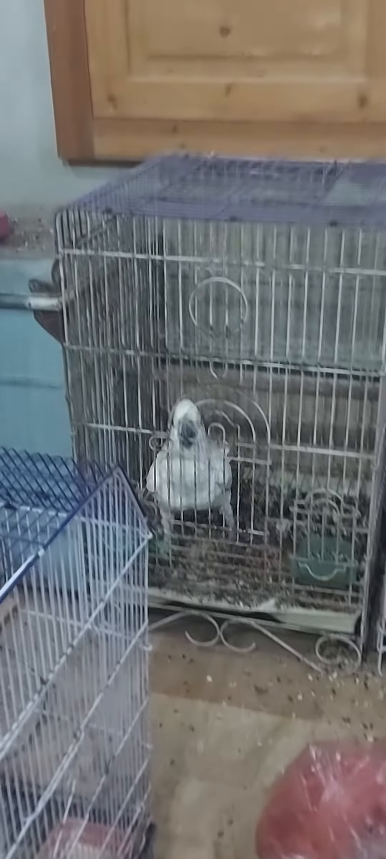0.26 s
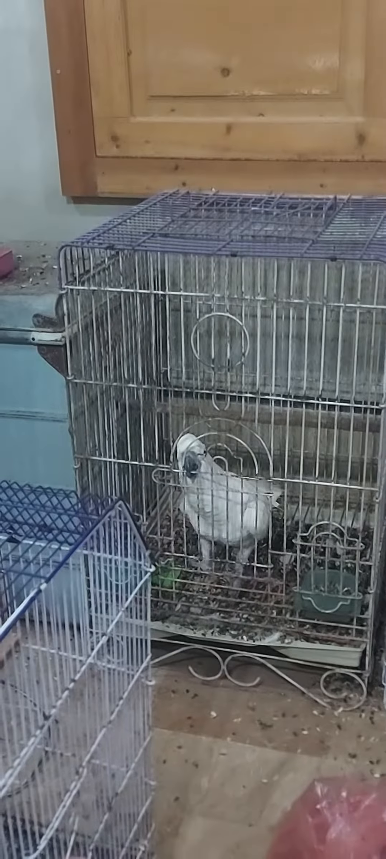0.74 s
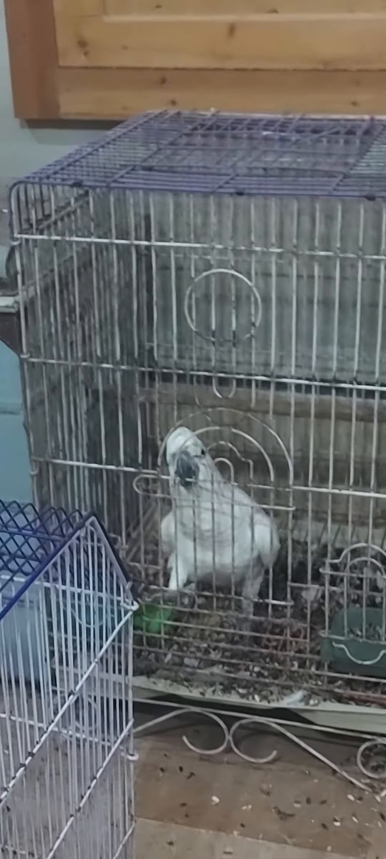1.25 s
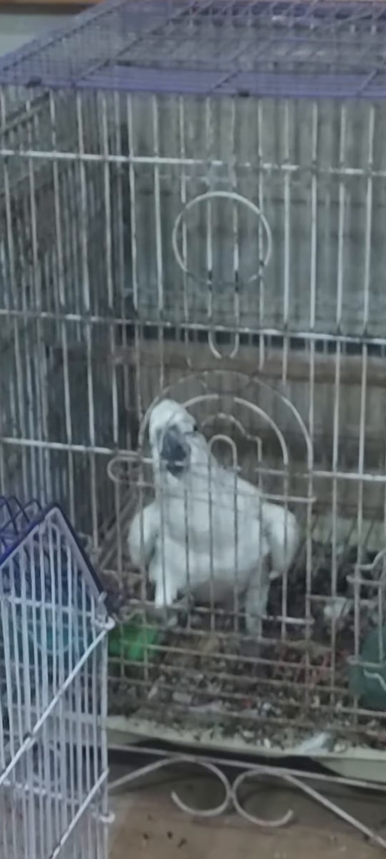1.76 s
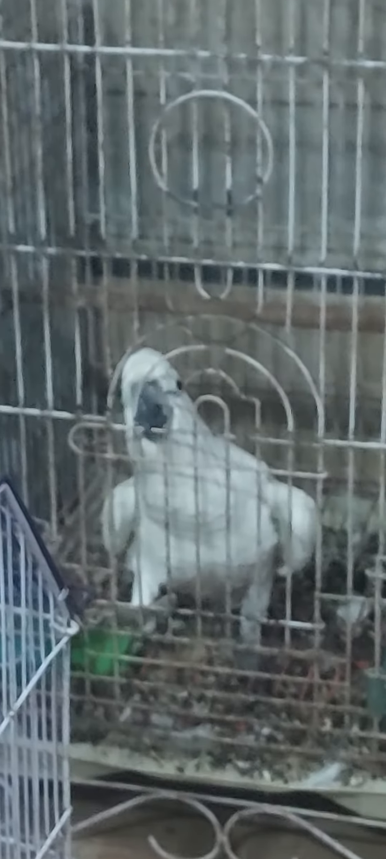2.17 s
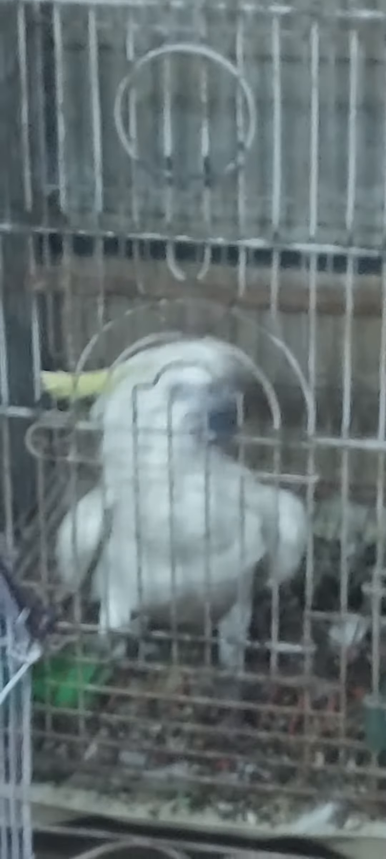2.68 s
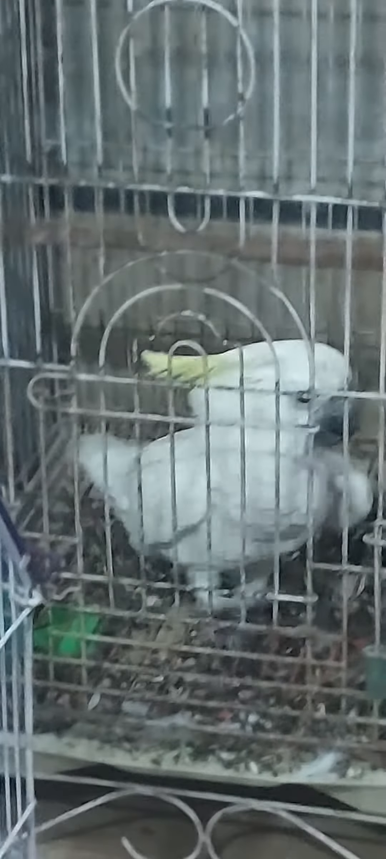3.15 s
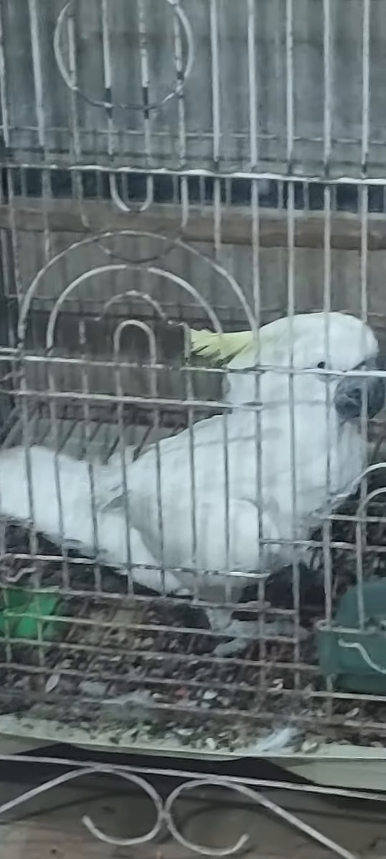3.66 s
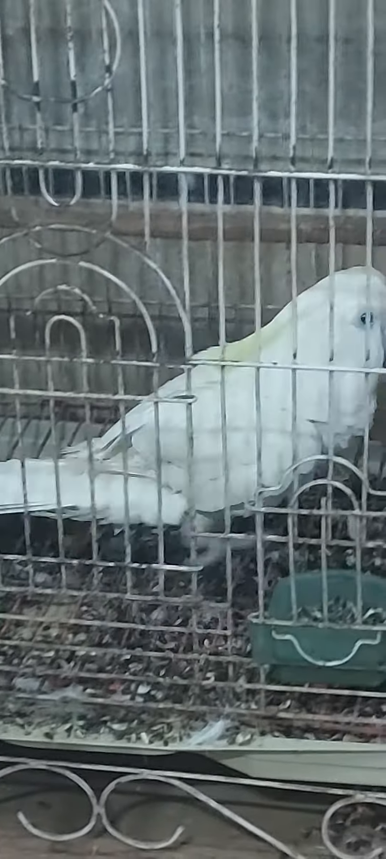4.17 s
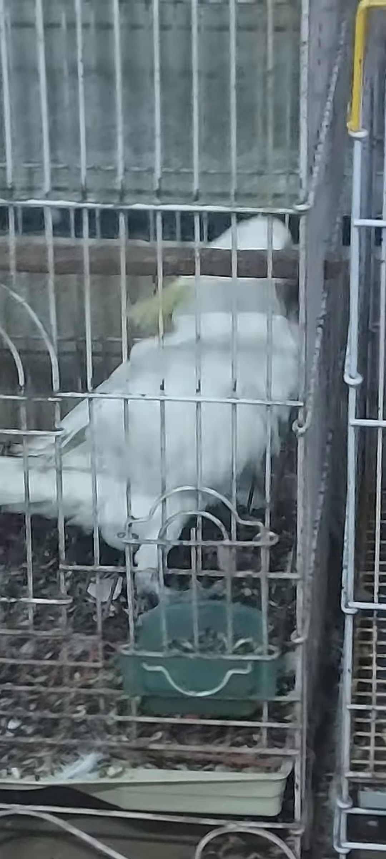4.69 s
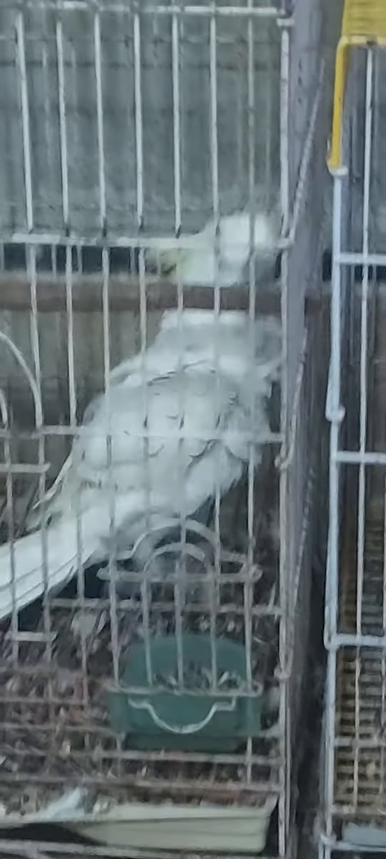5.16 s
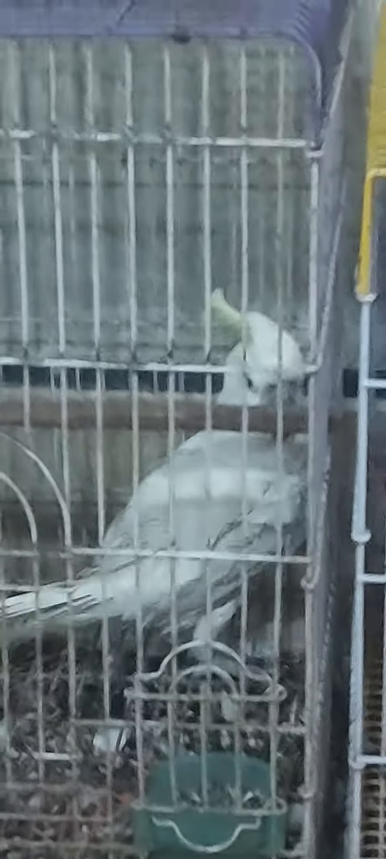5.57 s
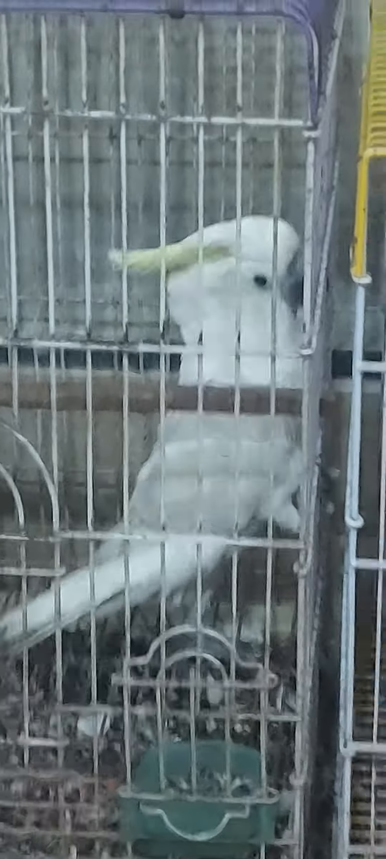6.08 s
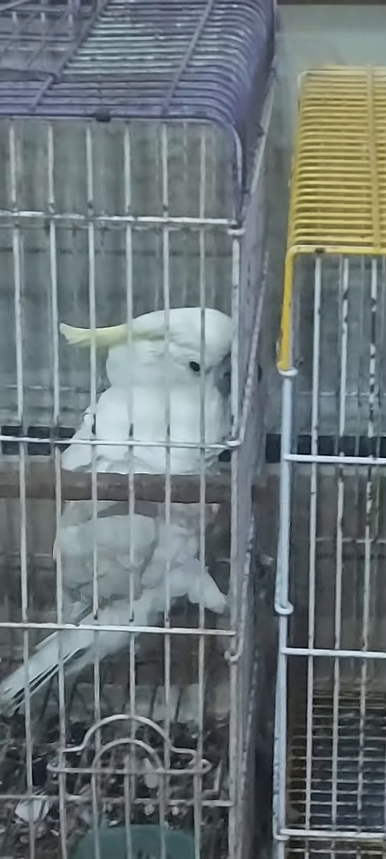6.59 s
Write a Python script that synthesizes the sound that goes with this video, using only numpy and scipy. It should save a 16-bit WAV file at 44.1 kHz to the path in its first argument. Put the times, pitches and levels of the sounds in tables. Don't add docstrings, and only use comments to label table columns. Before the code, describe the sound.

A large parrot is already screeching at 0 s, in a hard-walled room that rings for about half a second. Its calls are loud, shrill and rough, mostly a quarter second long: a breathy start, a piercing high tone, then a sinking pitch that splits into gritty rasp. They come at 0, 0.1, 0.5 and 0.9 s, the fourth with a sliding whistle; then 1.8 and 2.1; then a run at 2.8, 3.2, 3.5 and 3.8. A pause follows, until two bright screams at 5.1 and 5.7. Low hoarse gasps accompany or fall between calls. Faint steady hum, soft air hiss and muffled low steps continue underneath, steps busiest before 2.3 s. Small rustles puff at 1.3, 1.6 and 2.7. Around 6.1-6.2 a dull knock bumps the handheld stereo microphone with a louder rustle, then scattered litter sounds at 6.5 and 6.8. The calls lean slightly right, shifting as the microphone swings.

```python
import sys
import numpy as np
from scipy import signal
from scipy.fft import rfft, irfft, next_fast_len
from scipy.io import wavfile
from scipy.ndimage import uniform_filter1d, minimum_filter1d

SR = 44100
rng = np.random.default_rng(int(sys.argv[2]) if len(sys.argv) > 2 else 0)


def generate_wav(signal):
    frames = np.transpose(np.atleast_2d(signal))
    scaled = np.clip(frames, -1, 1) * 32767
    pcm = np.round(scaled).astype(np.int16)
    wavfile.write(sys.argv[1], SR, pcm)


def boost(x):
    u = np.asarray(x, float) / 20
    return 10 ** u


N = 301203
LEAD = 8000
LONGEST = 26000

# start in seconds,
# lock after in seconds, length in seconds, effort in dB, brightness in dB.
SCREECHES = [(0.0, -.2, 0.095, -15.5, -4.5), (.099, .004, 0.2, -12, -2), (0.477, .02, .24, -13.5, -4.5),
             (0.904, .023, 0.23, -13.5, -2), (1.758, .025, .25, -11, -0.5), (2.086, .015, .23, -13, -2.5),
             (2.792, .018, .255, -12, -2), (3.176, .015, 0.2, -14.5, -2), (3.529, .023, .21, -12, -1.5),
             (3.8, .018, 0.27, -13.5, -5), (5.117, .024, 0.24, -12.5, 1), (5.672, .031, .255, -12, 0.5)]
# first pitch in Hz, top pitch in Hz,
# top reached at share of length, last pitch in Hz, wobble as a share of the pitch.
PITCHES = [(4270, 4290, 0.016, 4116, .022), (4820, 4790, 0.027, 4330, .015), (4870, 4880, .08, 4320, 0.019),
           (4897, 4900, .3, 4450, 0.01065), (4600, 4550, .3, 4145, 0.02), (4895, 4920, .25, 4180, .017),
           (4820, 4960, .08, 4190, .019), (4620, 4500, 0.394, 4250, 0.0214), (4495, 4490, 0.09, 4400, .013),
           (4165, 4720, 0.33, 4040, .013), (4760, 4850, .2, 4430, .013), (4876, 4860, 0.11, 4237, 0.018)]
# doubling sets in at share of length, doubling in dB,
# rasp returns at share of length, rasp in dB, rasp at its clearest in dB.
BREAKS = [(.3, -7, 0.51, -16.5, -22.5), (0.41, -0.5, .7, -12.5, -28.5), (0.68, -2.5, 0.79, -12.5, -28.5),
          (0.57, -4, 0.69, -11, -19.5), (.4, -7, .7, -15, -21.5), (.6, -5, .6, -16, -21.5),
          (.5, -8, .75, -11.5, -19.5), (0.54, -13, 0.7, -14, -21), (.42, -2.5, 0.71, -13.5, -25),
          (0.77, -8, 0.79, -14, -28), (0.55, -0.5, .8, -10.5, -28), (0.56, -4, 0.704, -13.5, -26.5)]
# onset against full effort in dB, swell in seconds,
# release from share of length, release depth in dB, pitch has sunk by share of length.
BREATHS = [(-5, .03, .4, -10, .9), (-5, 0.022, 0.63, -11, .85), (-5, .04, 0.73, -17, .85),
           (-3.5, .04, 0.77, -25.5, .9), (-6.5, 0.068, 0.45, -18.5, 0.94), (-2.5, .08, 0.68, -10.5, .9),
           (-10, 0.12, 0.67, -9, .85), (-2, 0.12, 0.81, -24.5, 0.79), (-6, .055, .55, -17, .9),
           (4, .03, 0.74, -18, .8), (-7.5, 0.067, 0.53, -6, .9), (-3.5, 0.14, 0.7, -21.5, .9)]
# frequency in Hz, level in dB.
THROAT = [(1200, -46.5), (1700, -22), (2150, -10.5), (3400, -7.5), (4600, -1.5), (5700, -15), (6900, -13),
          (8100, -10.5), (9300, -24), (11500, -16.5), (14000, -26.5), (16500, -27)]
# frequency in Hz, level in dB.
RASP = [(700, -40), (1300, -25), (2100, -14), (2800, -14.5), (3600, -3), (4600, -5), (6000, -12),
        (8500, -13), (10000, -18), (13000, -20), (16500, -31)]
# frequency in Hz, time to fall by 60 dB in seconds.
ROOM_RING = [(1000, 0.46), (2300, 0.51), (4500, 0.49), (8000, 0.43), (14000, 0.28)]
# left delay in seconds, left gain,
# right delay in seconds, right gain.
NEAR_ECHOES = [(.0031, 0.87, 0.0026, -0.88), (.0058, -0.43, 0.0059, 1), (.0094, 0.99, 0.0089, -0.73),
               (0.0117, 0.14, 0.015, 0.63), (0.02, -0.38, .0178, 0.073)]
# time in seconds, left minus right in dB.
SWING = [(0.0, -4), (0.14, -2.5), (0.652, -3.5), (0.962, -2), (1.55, -5.5), (1.592, 0.5), (1.928, -3.5),
         (2.59, -3), (2.64, -0.5), (3.28, -3.5), (3.92, -2.5), (4.33, -6.5), (5.25, -2.5), (5.47, -3.5),
         (5.699, -1.5), (6.2, -5)]
# frequency in Hz, level in dB per Hz.
AIR = [(18, -69), (30, -40), (100, -27.5), (161, -22.5), (221, -25.5), (394, -14.5), (437, -18.5),
       (486, -12), (616, -17.5), (1130, -21), (1590, -25), (2410, -28), (3060, -28.5), (11400, -48),
       (16000, -58.5)]
# frequency in Hz, likeness from 0 to 1.
LIKENESS = [(60, 0.94), (180, 0.95), (550, 0.29), (1650, 0.25), (4970, 0.015), (15000, 0.04)]
# frequency in Hz, level in dB.
HUM = [(484.5, -55.5), (689.1, -71.5), (963.6, -68.5), (1104, -65.5), (1378, -70.5)]
# time in seconds, boom in dB, upper knock against boom in dB,
# held in seconds.
STEPS = [(.19, -49, -2.5, .02), (.44, -55, -11, .02), (.59, -58, -16.5, 0.017), (.82, -49.5, -8, 0.041),
         (.99, -53, -9, 0.014), (1.29, -59, -9, 0.038), (1.41, -45, -3, 0.031), (1.67, -44, -5, 0.053),
         (2.0, -52.5, -1, 0.048), (2.239, -49.5, -9, 0.043), (2.661, -64, 0, .02), (2.99, -56, -3, .02),
         (3.29, -63, 2.5, 0.025), (3.59, -58.5, -2, .04), (4.41, -56, -9.5, .3),
         (4.979, -57.5, -8.5, 0.021), (5.309, -61.5, 5, 0.018), (5.52, -56, -4, 0.023),
         (5.84, -53, 7, 0.023), (6.02, -61, -5.5, .06), (6.13, -46, -7.5, 0.1)]
# frequency in Hz, width in Hz, level in dB.
BOOM = [(94.4, 26, 0), (116.5, 19, 5), (160.4, 16, 4)]
# frequency in Hz, width in Hz, level in dB.
KNOCK = [(265, 90, -2), (323.6, 35, 0)]
# start in seconds, length in seconds, centre in Hz, #
# width in Hz, level in dB.
GASPS = [
    (.19, 0.067, 990, 700, -42),
    (.22, 0.079, 1670, 301, -34.5),
    (1.759, 0.064, 1430, 502, -37.5),
    (2.814, 0.092, 1526, 301.2, -37.5),
    (3.069, 0.071, 1014, 796, -35),
    (3.397, 0.057, 920, 118.6, -41.5),
    (3.398, .07, 1800, 250, -36),
    (3.769, 0.065, 1017, 200, -36.5),
    (3.802, 0.14, 1380, 400, -37.5),
    (5.828, 0.099, 1330, 199, -42),
]
# start in seconds, end in seconds,
# from pitch in Hz, to pitch in Hz, level in dB.
WHISTLES = [
    (.945, 1.08, 4250, 3250, -15),
    (2.13, 2.25, 4500, 4150, -18),
    (1.83, 1.95, 4200, 3900, -18),
    (2.88, 3.0, 4300, 4100, -18),
]
# start in seconds, level in dB, rise in seconds,
# time to fall by 60 dB in seconds, brightness in dB.
RUSTLES = [
    (1.33, -54, 0.022, .15, -1),
    (1.629, -52, .02, 0.15, -4),
    (2.681, -57, .02, .15, 5),
    (4.358, -60, .01, 0.13, 7.5),
    (4.78, -73, .01, .1, 1.5),
    (6.14, -47, 0.028, 0.23, 4),
    (6.47, -48, .004, 1, 1),
    (6.78, -51, .004, 0.79, 4),
]
# frequency in Hz, level in dB per Hz.
RUSTLE_COLOUR = [(710, -31), (1200, -2), (1640, -9), (1790, -11.5), (2380, -7), (7910, -20), (14000, -25),
                 (16000, -32.5)]
# time in seconds, peak in dB, ring in Hz,
# time to fall by 60 dB in seconds.
THUDS = [
    (6.119, -34, 315, 0.023),
    (6.183, -23.5, 303, 0.028),
    (6.234, -35, 302, 0.014),
]


def evened(x):
    return x / np.sqrt(np.mean(x ** 2) + 1e-20)


def read(points, hz):
    f, value = np.transpose(points)
    return np.interp(np.log(hz + 1), np.log(f + 1), value)


def add(mix, start, sound):
    part = mix[..., start:start + sound.shape[-1]]
    part += sound[..., :part.shape[-1]]


def drift(size, top_hz):
    smooth = signal.butter(2, top_hz, fs=SR, output="sos")
    noise = rng.standard_normal(max(size, LONGEST))
    twice = signal.sosfilt(smooth, signal.sosfilt(smooth, noise))
    return evened(twice[-size:])


def colour(x, points):
    hz = np.fft.rfftfreq(x.shape[-1], 1 / SR)
    return irfft(rfft(x) * boost(read(points, hz)), x.shape[-1])


def ramp(t, start, length):
    return np.clip((t - start) / max(length, .003), 0, 1)


def screech(call, pitch, breaks, breath):
    s, lock_s, length, top_db, bright_db = call
    first_hz, top_hz, top_at, last_hz, jitter = pitch
    double_at, late_double_db, rasp_at, late_rasp_db, clear_rasp_db = breaks
    onset_db, swell_s, release_at, release_db, sunk_at = breath
    clearing_s, breaking_s = .045, .04
    breath_double_db, clear_double_db, last_double_db = -14.5, -28, -14
    breath_rasp_db = -12

    start = round(s * SR) + LEAD if lock_s > 0 else 0
    t = (np.arange(start, (s + length) * SR + LEAD) - LEAD) / SR - s
    locked = ramp(t, lock_s, .004)
    clear = ramp(t, lock_s, clearing_s)
    release = ramp(t, release_at * length, (1 - release_at) * length)

    effort_db = top_db + onset_db * (1 - ramp(t, min(lock_s, 0), swell_s))
    effort_db = effort_db + release_db * release ** 1.2
    effort_db = effort_db - 5.7 * (1 - locked)
    bright_db = bright_db - 2 * release

    doubling = ramp(t, double_at * length - breaking_s, breaking_s)
    double_db = breath_double_db + (clear_double_db - breath_double_db) * clear
    double_db += last_double_db * release + (late_double_db - clear_double_db) * doubling
    roughening = ramp(t, rasp_at * length - breaking_s, breaking_s)
    rasp_db = breath_rasp_db + (clear_rasp_db - breath_rasp_db) * clear
    rasp_db += (late_rasp_db - clear_rasp_db) * roughening

    scoop = 1 - ramp(t, lock_s, top_at * length - lock_s)
    sag = ramp(t, top_at * length, (sunk_at - top_at) * length) ** 1.15
    loud_partial_hz = top_hz + (first_hz - top_hz) * scoop + (last_hz - top_hz) * sag
    pair_hz = loud_partial_hz / 4
    wobble = jitter * (1 + 2 * boost(rasp_db)) * 1.25 * np.tanh(.8 * drift(len(t), 240))
    turns = np.cumsum(pair_hz * (1 + wobble)) / SR

    tone = np.zeros(len(t))
    for k in range(1, 15):
        tilt_db = bright_db * np.log2(max(k, 4) / 4)
        odd_db = (k % 2) * (double_db + 3)
        level = boost(read(THROAT, k * pair_hz) + tilt_db + odd_db)
        tone += level * np.cos(2 * np.pi * k * turns)
    loudness = np.sqrt(abs(uniform_filter1d(tone ** 2, 300)) + 1e-9)

    puffs = (1 + np.exp(-(2 * turns % 1) / 0.24)) * rng.standard_normal(len(t))
    dull = evened(colour(puffs, RASP))
    treble = signal.lfilter(*signal.butter(2, 7000, "high", fs=SR), dull)
    rasp = dull + (boost(bright_db) - 1) * treble

    share = 1 - locked * (1 - np.clip(boost(rasp_db + 6), 0, .98))
    voice = np.sqrt(1 - share ** 2) * tone / loudness + share * rasp
    edge = np.clip(np.minimum(t - t[0], (t[-1] - t) / 2) / .007, 0, 1)
    shimmer_db = 4 * drift(len(t), 220)
    return start, boost(effort_db + shimmer_db) * voice * edge


def room(x):
    direct_db, early_db, tail_db = -11, -10, -4
    taps = np.zeros((2, SR))
    at = np.arange(300, SR - 20, 20) + rng.integers(0, 20, (2, (SR - 301) // 20))
    np.put_along_axis(taps, at, rng.choice([-1., 1.], at.shape), 1)
    hz, t, z = signal.stft(taps, SR, nperseg=256)
    fading = boost(-60 * t / read(ROOM_RING, hz)[:, None])
    tail = signal.istft(z * fading, SR, nperseg=256)[1]
    tail *= boost(tail_db) / np.linalg.norm(tail, axis=1, keepdims=True)
    tail[0, 13] += boost(direct_db)
    tail[1, 0] += boost(direct_db)
    for left_s, left, right_s, right in NEAR_ECHOES:
        tail[0, round(left_s * SR)] += left * boost(early_db)
        tail[1, round(right_s * SR)] += right * boost(early_db)
    return signal.fftconvolve(x[None], tail, axes=1)[:, LEAD:LEAD + N]


def air():
    frames, hz = N // 256 + 5, np.fft.rfftfreq(1024, 1 / SR)
    a, b, c, d, patches = rng.standard_normal((frames, 513, 5)).T
    patches = evened(uniform_filter1d(uniform_filter1d(patches, 10, 0), 14, 1))
    same = np.clip(read(LIKENESS, hz), -1, 1)[:, None]
    left, other = a + 1j * b, c + 1j * d
    z = np.array([left, same * left + np.sqrt(1 - same ** 2) * other])
    z *= boost(read(AIR, hz)[:, None] + 0.74 * patches)
    hiss = signal.istft(z, nperseg=1024, noverlap=768)[1][:, :N]
    return boost(-51) * evened(hiss)


def hum():
    t, out = np.arange(N) / SR, np.zeros((2, N))
    sides = boost(np.array([[-2.5], [2.5]]))
    for hz, db in HUM:
        turns = hz * t + 0.16 * drift(N, 7.5)
        waver = boost(db + 4.5 + drift(N, 5.8))
        out += waver * sides * np.sin(2 * np.pi * turns + [[0], [.9]])
    return out


def rung(modes):
    size = next_fast_len(N)
    hz = np.fft.rfftfreq(size, 1 / SR)
    gain = sum(boost(db) / (1 + (2 * (hz - f) / width) ** 2) for f, width, db in modes)
    return evened(irfft(rfft(rng.standard_normal(size)) * gain, size)[:N])


def rumble():
    rise_db_per_s, fall_db_per_s = 132.5, 110
    t = np.arange(0, N, 128) / SR
    boom = knock = boost(-72.5)
    for s, boom_db, knock_db, held in STEPS:
        before_db = rise_db_per_s * np.maximum(s - t, 0)
        after_db = fall_db_per_s * np.maximum(t - s - held, 0)
        swell = boost(boom_db - 4.5 - before_db - after_db)
        boom = boom + swell
        knock = knock + boost(knock_db) * swell
    boom, knock = (np.interp(np.arange(N) / SR, t, v) for v in (boom, knock))
    side = boost(-13) * np.array([[1], [-1]]) * rung(BOOM)
    return boom * (rung(BOOM) + side) + knock * rung(KNOCK)


def gasp(s, length, hz, width, db):
    size = round(length * SR)
    throat = signal.iirpeak(hz, hz / width, fs=SR)
    ring = signal.lfilter(*throat, rng.standard_normal(size))
    ring = signal.lfilter(*throat, ring)
    return round(s * SR) + LEAD, boost(db) * evened(ring) * np.hanning(size)


def whistle(start_s, end_s, from_hz, to_hz, db):
    size = round((end_s - start_s) * SR)
    hz = np.geomspace(from_hz, to_hz, size) * (1 + 0.01 * drift(size, 200))
    tone = np.sin(2 * np.pi * np.cumsum(hz) / SR)
    return round(start_s * SR) + LEAD, boost(db) * tone * signal.windows.tukey(size)


def rustles():
    t, out = np.arange(SR // 2) / SR, np.zeros((2, N))
    for s, db, rise, t60, bright_db in RUSTLES:
        grains = rng.standard_normal((2, len(t))) * boost(1.3 * drift(len(t), 120))
        tilted = [(hz, level + bright_db * np.log2(hz / 4000)) for hz, level in RUSTLE_COLOUR]
        fade = boost(db - 60 * np.maximum(t - rise, 0) / t60)
        shape = np.minimum(t / rise, 1) * fade
        add(out, round(s * SR), evened(colour(grains, tilted)) * shape)
    return out


def thuds():
    t, out = np.arange(4000) / SR, np.zeros(N)
    for s, db, hz, t60 in THUDS:
        push = -.8 * (1 - t / 0.0071) * np.exp(-t / 0.0061) * np.minimum(t / 0.0022, 1)
        ring = boost(-60 * t / t60) * np.sin(2 * np.pi * hz * t)
        add(out, round(s * SR), boost(db) * (push + ring))
    return out


def scene():
    bird = np.zeros(N + LEAD)
    for rows in zip(SCREECHES, PITCHES, BREAKS, BREATHS):
        add(bird, *screech(*rows))
    for row in GASPS:
        add(bird, *gasp(*row))
    for row in WHISTLES:
        add(bird, *whistle(*row))
    swing_db = np.interp(np.arange(N) / SR, *np.transpose(SWING)) / 2
    heard = room(bird) * boost(np.array([swing_db, -swing_db]))
    return heard + air() + hum() + rumble() + rustles() + thuds()


def low_pass(x):
    return signal.sosfilt(signal.butter(12, 16500, fs=SR, output="sos"), x)


def record(dry):
    folded = dry ** 2 - uniform_filter1d(dry ** 2, size=1200)
    low_cut = signal.butter(3, 50, "high", fs=SR, output="sos")
    bent = signal.sosfilt(low_cut, dry + 0.055 * folded)
    peak = -minimum_filter1d(-abs(bent).max(0), size=200)
    held = bent / np.maximum(uniform_filter1d(peak, size=200), 1)
    return low_pass(held)


dry = scene()
out = record(dry)
generate_wav(out)
```